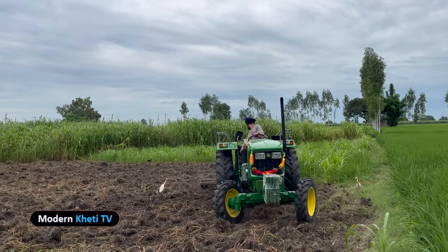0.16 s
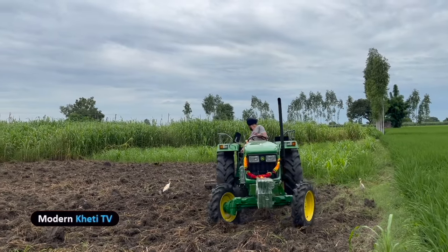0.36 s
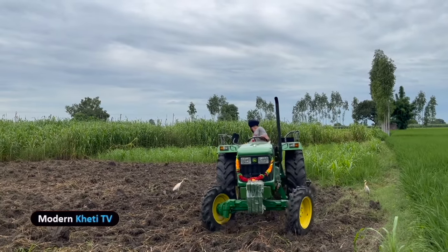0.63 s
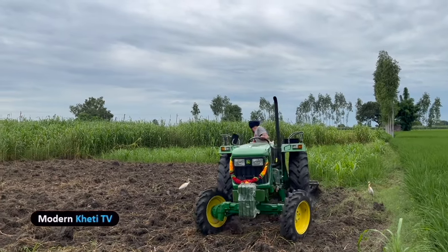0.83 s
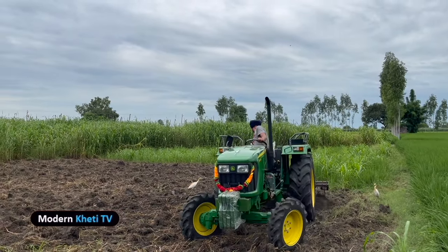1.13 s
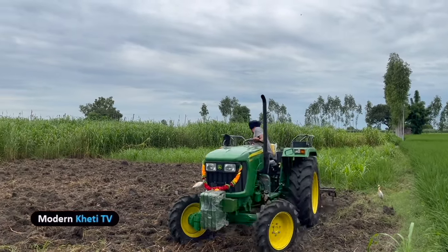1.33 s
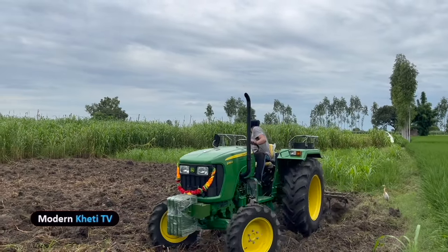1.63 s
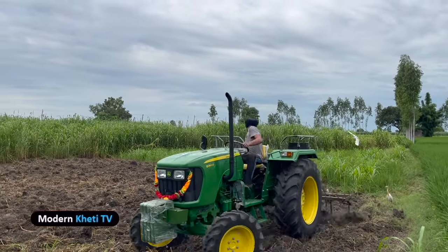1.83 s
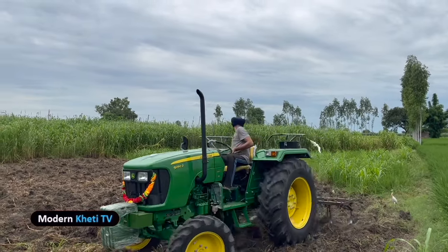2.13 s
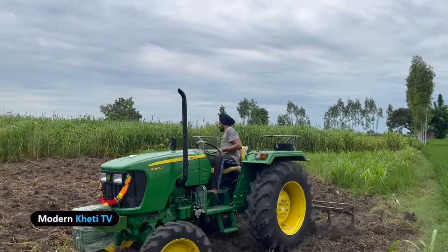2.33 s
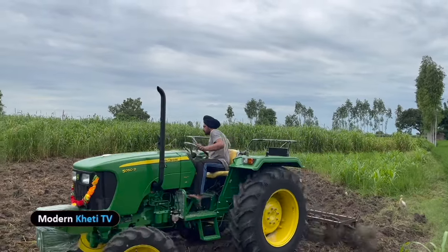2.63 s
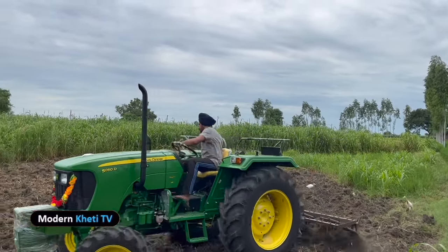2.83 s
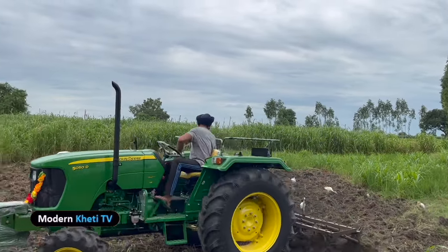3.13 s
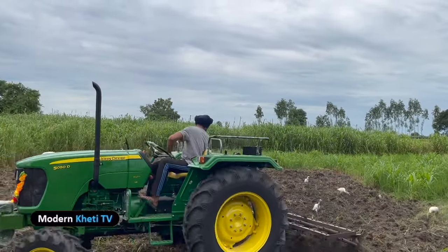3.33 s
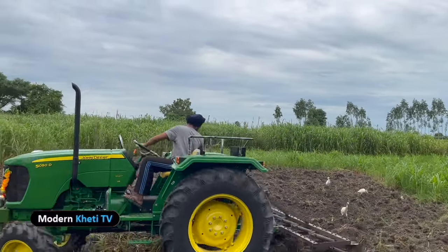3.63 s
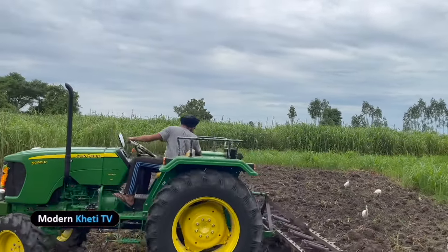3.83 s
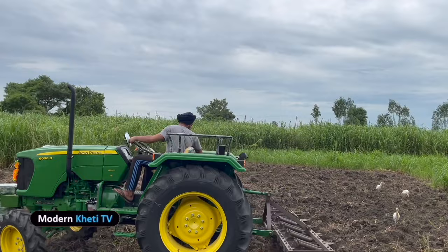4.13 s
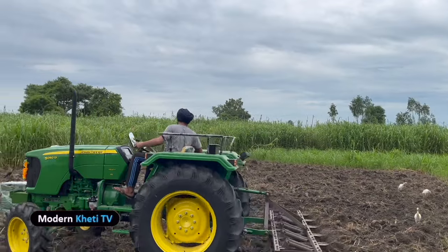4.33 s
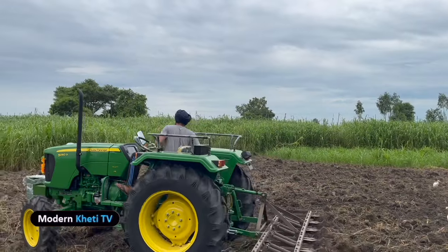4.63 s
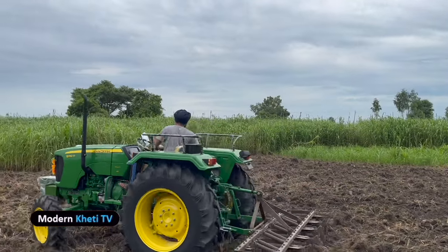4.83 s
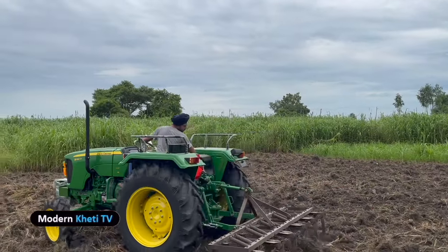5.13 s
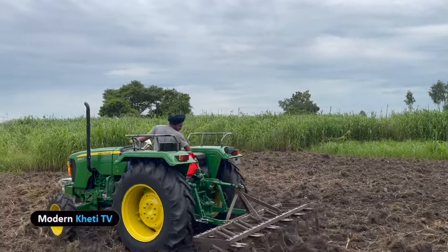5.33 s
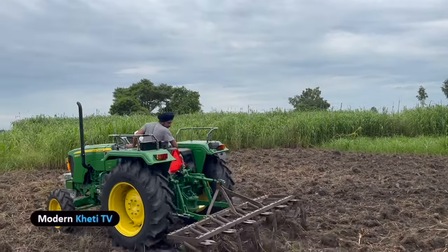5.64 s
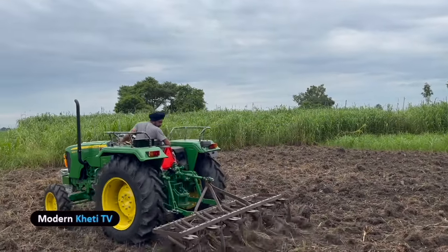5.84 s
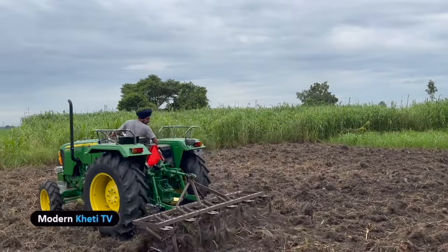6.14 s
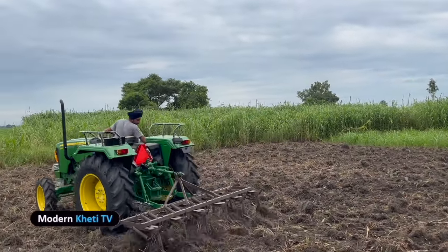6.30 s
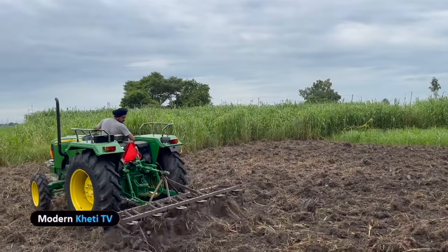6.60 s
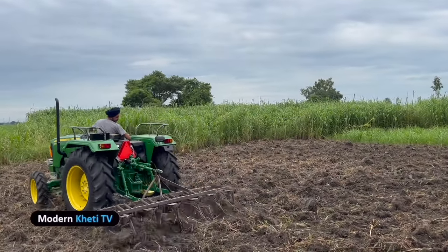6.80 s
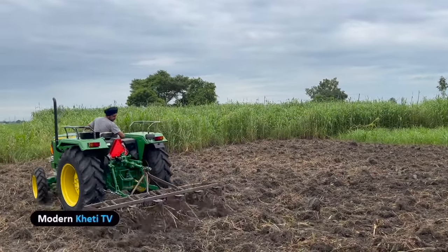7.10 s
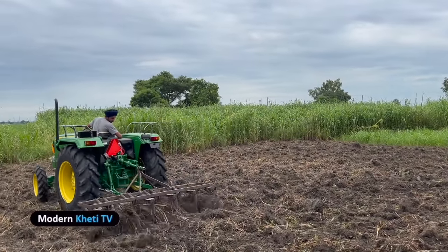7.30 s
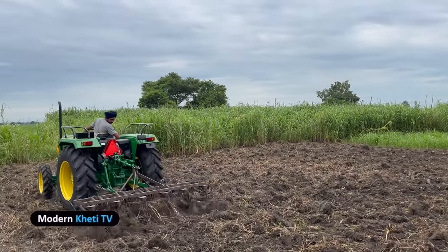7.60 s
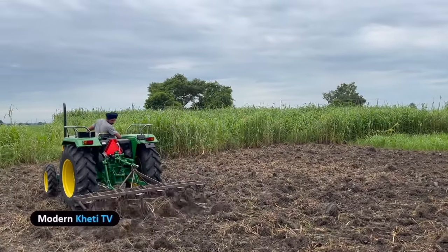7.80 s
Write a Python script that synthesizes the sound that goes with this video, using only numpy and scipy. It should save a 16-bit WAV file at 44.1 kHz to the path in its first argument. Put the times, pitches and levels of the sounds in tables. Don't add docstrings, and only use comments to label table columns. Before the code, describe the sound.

A three-cylinder diesel tractor works in an open field. It approaches with fast, low exhaust pulses and hard hollow barks in the first second, then its side passes with a boomier drone, clatter and brief gear whine. From behind it grows duller and quieter. The engine briefly races and slackens as the load slips. Close stereo microphones, outdoors, almost no reverberation.

```python
import sys
import numpy as np
from scipy import signal
from scipy.io import wavfile
from scipy.ndimage import uniform_filter1d

SR = 44100
rng = np.random.default_rng(int(sys.argv[2]) if len(sys.argv) > 2 else 0)


def to_wav(sig):
    pcm = np.clip(np.atleast_2d(sig), -1, 1) * 32767
    pcm = np.round(pcm).astype(np.int16)
    wavfile.write(sys.argv[1], SR, pcm.T)


def nominal_scale(level):
    x = np.asarray(level, float) / 20
    return 10 ** x


N = 351036

# cut_s, slip_size, half_length_s
TINE_SLIPS = [(0.14, 6.1, 0.2), (1.39, 6.1, 0.117), (2.04, 7.1, 0.143), (2.52, 4.1, 0.162),
              (3.26, 1.1, 0.107), (3.82, 3.6, 0.415), (4.69, 2.0, 0.173), (5.28, 4.2, 0.077),
              (6.03, 1.2, 0.069), (6.48, 2.8, 0.099), (7.49, 1.4, 0.119), (7.8, 4.1, 0.191)]


def evened(x):
    return x / np.sqrt(np.mean(np.abs(x) ** 2) + 1e-20)


def columns(rows, at):
    first, *rest = np.transpose(rows)
    return np.array([np.interp(at, first, c) for c in rest])


def facing(t):
    # time_s, aspect (0 front, 1 flank, 2 rear)
    turning = [
        (0, 0.13),
        (1.4, 0.34),
        (2.4, 0.81),
        (3.8, 1.056),
        (5.4, 1.476),
        (7.96, 1.464),
    ]
    aspect = columns(turning, t)[0]
    return np.array([np.clip(1 - abs(aspect - k), 0, 1) for k in range(3)])


def slips(t, sizes, before=1, after=1):
    total = 0
    for (s, _, half), size in zip(TINE_SLIPS, sizes):
        width = half * np.where(t < s, before, after)
        total = total + size * np.exp(-((t - s) / width) ** 2)
    return total


def crank(t):
    # time_s, firings_per_s
    held_speed = [(-.095, 31.185), (.519, 29.222), (1.444, 31.606), (1.465, 31.155), (1.98, 30.129),
                  (2.018, 30.846), (2.956, 31.186), (4.13, 29.895), (4.457, 31.547), (4.761, 30.775),
                  (5.5, 32.127), (6.12, 31.01), (6.407, 31.914), (6.554, 30.399), (7.268, 30.777),
                  (7.725, 30.035), (7.96, 32.849)]
    race_per_slip, cut_lag_s = .483, .152
    rate = columns(held_speed, t)[0] + race_per_slip * slips(t + cut_lag_s, np.transpose(TINE_SLIPS)[1])
    turns = np.cumsum(rate) / SR - .135
    return rate, turns


def pull(t):
    # time_s, effort
    load = [(0, 0.29), (.15, 0.2), (.45, 0.82), (1.15, 0.83), (1.3, .2), (1.5, 0.24), (1.7, 0.64),
            (1.9, 0.28), (2.3, .4), (2.5, 0.17), (2.9, 1), (3.15, 0.43), (4, 0.46), (5.05, 0.4),
            (6.45, 0.1), (6.9, 0.75), (7.4, 0.65), (7.96, 0.05)]
    return np.clip(columns(load, t), 0, 1)


def source_levels(t, effort):
    # front_db, flank_db, rear_db, share_of_distance_loss, full_effort_db
    layers = [
        (-16, -17.5, -30, 0.2, 1),
        (-25.5, -11.5, -28.5, 2.56, -0.3),
        (-30, -21.5, -29, 0.84, 0.4),
        (-33, -27, -41.5, 1.19, 2),
    ]
    # time_s, distance_loss_db
    distance = [(0, 0), (.5, -1.3), (1.15, -0.9), (1.8, -.6), (3, -3.5), (4.2, -2.5), (5.6, -4), (7, -5.5),
                (7.96, -8)]
    cuts = [4.8, 5.2, 6.4, 3.6, 1.2, 3.5, 2.8, 4.5, 1.2, 2.3, 0.47, 2.1]
    cut_shares = [
        (0.74, 1.6, 1.2),
        (.8, 0.88, 2.9),
        (.5, 0.35, 0.47),
        (1.27, 0.97, 0.73),
    ]
    cut_db = slips(t + 0.027, cuts, before=0.8, after=1.26)
    influences = np.vstack([facing(t), columns(distance, t), effort])
    return np.dot(layers, influences) - np.dot(cut_shares, facing(t)) * cut_db


def drift(hz, count):
    z = rng.standard_normal((count, N // 64 + 2, 2)) @ [1, 1j]
    z = signal.lfilter([1], [1, -np.exp(-2 * np.pi * hz * 64 / SR)], z)
    return np.repeat(evened(z), 64, axis=1)[:, :N]


def resonate(x, hz, width):
    return signal.lfilter(*signal.iirpeak(hz, hz / width, SR), x)


def noise(table, patchy_db):
    frames, hz = N // 128 + 5, np.fft.rfftfreq(512, 1 / SR)
    inside = (hz > table[0][0] / 2) & (hz < table[-1][0] * 1.3)
    shares = facing(np.arange(frames) * 128 / SR)
    gain = nominal_scale(columns(table, hz).T @ shares) * inside[:, None]
    gain /= np.sqrt((gain ** 2).mean(0))
    patches = uniform_filter1d(rng.standard_normal((frames, 257)), size=14, axis=0)
    patches = evened(uniform_filter1d(patches, size=5, axis=1))
    z = (rng.standard_normal((frames, 257, 2, 2)) @ [1, 1j]).T
    z = z * gain * nominal_scale(patchy_db * patches.T)
    return evened(signal.istft(z, nperseg=512, noverlap=384)[1][:, :N])


def burst(turns, rate, rise_s, fall_s):
    age = (turns % 1) / rate
    return evened((1 - np.exp(-age / rise_s)) * np.exp(-age / fall_s))


def blows(turns, spread_db, count):
    firing = np.floor(turns).astype(int) + 1
    total = firing[-1] + 1
    habit_db = np.array([1.2, -.3, -.9])[np.arange(total) % 3, None]
    db = spread_db * rng.standard_normal((total, count)) + habit_db
    return nominal_scale(db)[firing].T


def body(t, turns, rate, body_db, share):
    # freq_hz, front_db, flank_db, rear_db
    wash_bands = [(30, -10, -7, -12), (102.2, 0, -4.5, 21), (202, 4.5, 7.5, -6), (270, 3, 1, 0.5),
                  (345, 4.5, 0.5, 15), (437, 1.5, -2, -1), (744, -1.5, -2.5, 1.5), (977, -5.5, -8, 3.5),
                  (1110, -6, -5, -3.5), (1260, -6, -7.5, -3), (1860, -5, -14.5, -8.5),
                  (2120, -9.5, -14, -17)]
    # freq_hz, width_hz, front_db, flank_db, rear_db, swell_start_s, swell_end_s, swell_db
    whines = [(429.2, 34, -4.5, -15, -7, 6.5, 5.2, 3), (1303, 34, -36, -26.5, -19, 6.45, 7.6, 11.5),
              (1755, 43, -16.5, -19.5, -18, 6, 7.1, -1), (2762, 63, -13, -24.5, -13.5, 5.5, 5.2, 4),
              (3596, 85, -14, -37.5, -41, 1.8, 3.7, 17), (5200, 420, -39, -22, -35, 3.6, 3.4, 8)]
    throb = burst(turns - .05, rate, rise_s=.002, fall_s=0.0061)
    wash = nominal_scale(1.5) * noise(wash_bands, 1.23) * (np.sqrt(1 - share) + np.sqrt(share) * throb)
    white = rng.standard_normal((N, 2)).T
    for hz, width, *db, start, end, swell_db in whines:
        swell = np.clip(np.minimum(t - start, end - t) / 0.077, 0, 1)
        level_db = np.dot(db, facing(t)) + swell_db * swell
        wash = wash + nominal_scale(level_db) * evened(resonate(resonate(white, hz, width), hz, width))
    gear_db = np.interp(t, [2.4, 2.6, 3.0, 3.2, 4.6, 5.0], [-21, -1.0, -5.5, -34, -25, -6])
    wash = wash + nominal_scale(gear_db) * np.cos(2 * np.pi * 14 * turns)
    return nominal_scale(body_db - 2.0) * wash


def knock(t, turns, rate, knock_db, share):
    # freq_hz, front_db, flank_db, rear_db
    block_bands = [(1460, -11, -7.5, -3), (2040, -15.5, -9, -41), (2350, 1, -15, -17),
                   (2880, -2.5, 0, -4.5), (3220, -0.5, -1.5, 1.5), (3800, 3, -5, -6.5),
                   (4230, -3.5, -7.5, -5), (5100, -8.5, -10, -8), (6200, -6.5, -13.5, -8.5),
                   (8600, -10, -11, -14), (10300, -13.5, -11.5, -8), (12600, -17.5, -17.5, -14),
                   (14300, -19, -18, -5), (15600, -20, -26, -45)]
    # freq_hz, width_hz, front_db, flank_db, rear_db
    metal = [(2420, 120, -13, -22, -11), (2680, 65, -21, -3, 16), (3510, 140, -28, -3, 9),
             (3870, 170, -2, -4.5, 14), (4340, 160, 4, -8.5, 23)]
    shares = facing(t)
    strength = blows(turns, 0.99, count=3 + len(metal))
    clatter = signal.lfilter([.7], [1, -.3], noise(block_bands, 2.2))

    fall_s = np.dot([.009, .008, .004], shares)
    hiss = noise(block_bands, 2.5)
    block = signal.lfilter(*signal.butter(2, 5000, fs=SR), hiss)
    low = strength[0] * block * burst(turns, rate, 0.011, fall_s)
    high = strength[1] * (hiss - block) * burst(turns, rate, 0.0044, 0.89 * fall_s)

    tick = rng.standard_normal((N, 2)).T * burst(turns, rate, rise_s=0.00011, fall_s=0.001)
    rings = 0
    for (hz, width, *db), s in zip(metal, strength[3:]):
        rings = rings + nominal_scale(np.dot(db, shares)) * evened(resonate(tick * s ** 3, hz, width))
    valves = evened(resonate(tick * strength[2] ** 4, 9800, 3000)) * nominal_scale(np.dot([-30, -19, -26], shares))
    struck = 1.47 * (low + high) + nominal_scale(-12) * rings
    return nominal_scale(knock_db) * (np.sqrt(1 - share) * clatter + np.sqrt(share) * struck + valves)


def barks():
    # start_s, peak_db, pitch_hz, bonnet_db
    hard_firings = [(0.393, -12, 600, -27), (0.426, -22, 630, -19), (0.461, -12.5, 574, -19),
                    (0.529, -19, 780, -23), (0.565, -17, 655, -31), (0.597, -22, 600, -27),
                    (0.629, -18, 915, -17), (0.665, -33, 456, -22), (0.698, -14.5, 920, -40),
                    (0.731, -13.5, 580, -18), (0.766, -17, 745, -26), (0.8, -12, 860, -22),
                    (0.865, -13, 654, -23), (0.898, -15, 630, -30), (0.932, -15, 537, -26),
                    (0.966, -19, 560, -29), (0.998, -13.5, 860, -43), (1.03, -11.5, 880, -16),
                    (1.062, -5.5, 533, -42), (1.093, -11, 860, -30), (1.124, -13, 467, -21.5),
                    (1.156, -11, 606, -33), (1.185, -7.5, 620, -37), (1.217, -8.5, 537, -21)]
    bonnet_hz, bonnet_decay_s = 323, 0.01
    out, age = np.zeros(N), np.arange(2400) / SR
    for (s, db, hz, bonnet_db), (a, b, c) in zip(hard_firings, rng.random((len(hard_firings), 3))):
        turns = hz * (age + 0.27 * 0.002 * (1 - np.exp(-age / 0.0012)))
        ring = np.sin(2 * np.pi * (turns + a))
        ring = ring + 0.44 * np.sin(2 * np.pi * (1.53 * turns + b))
        ring = nominal_scale(db + 3.0) * ring * age / 0.0047 * np.exp(1 - age / 0.0019)
        bonnet = np.sin(2 * np.pi * (bonnet_hz * age + c))
        bonnet = bonnet * (1 - np.exp(-age / 0.0034)) * np.exp(-age / bonnet_decay_s)
        out[round(s * SR):][:len(age)] += ring + nominal_scale(bonnet_db + 5.5) * bonnet
    return out


def exhaust(t, turns, exhaust_db, boom_db):
    orders = [(3, -25, -22, -21), (4, -17, -18.5, -17), (5, -15, -8, -15), (6, 0, 1.5, -4),
              (6.995, -11.5, -12.5, -28), (8, -15, -5, -20), (9, -4, -7.5, 1), (10, -23, -39, -9),
              (11, -31, -21, -22), (12, -12.5, -7, -15), (13, -2, -15, -18), (14, -20, -12.5, -9),
              (15.01, -5.5, -2.5, -38), (16, -13.5, -0.5, -7), (17, -5, -13.5, -13), (18.43, -9, -5, -7),
              (20.8, -19, -23, 0)]
    out, shares = np.zeros(N), facing(t)
    quick, slow = drift(14.4, count=len(orders)), drift(.6, count=len(orders))
    for (k, *db), z, lazy in zip(orders, quick, slow):
        k = round(k)
        if k % 3 == 0:
            shape = np.exp(1.48j) + .08 * z
        else:
            shape = .85 * lazy / abs(lazy) + .15 * z
        level = nominal_scale(np.dot(db, shares) + (exhaust_db if k <= 12 else boom_db))
        out += level * (shape * np.exp(2j * np.pi * k / 3 * (turns + .382))).real
    return 1.216 * out


def ports(waves):
    # time_s, extra_path_ms, share
    ground = [(2.5, 2.9, 0.05), (3.5, 1.97, 0.16), (5.5, 1.874, 0.36), (7.96, 1.74, 0.55)]
    # freq_hz, side_over_mid_front_db, side_over_mid_later_db, coherence, phase_rad
    pair_response = [(50, -17, -4, 1, 1.75), (100, -29, -18, 0.95, 2.1), (430, -29.5, -10.5, 1, 1.5),
                     (1010, -19.5, -5, 1, 0.82), (1540, -8, 0.5, 0.66, 1.74), (2120, -24, -8.5, 0.68, 1.25),
                     (3210, -16.5, 1, 0.73, 1.07), (4530, -25.5, -1.5, 0.65, 0.7), (5560, 2, 0, .5, -2.2),
                     (6700, -4, -8, .5, -0.5), (7380, 1.5, 3, 0.47, -1.8), (8300, 14, 15.5, 0.24, -6.5),
                     (8510, 9.5, 9.5, 0.44, 1.5), (10950, -1.5, -5.5, 0.24, 1), (11800, -19.5, -33, .1, 3),
                     (12940, -12.5, -10, .4, -1.6), (15130, 14, 17.5, .2, -1.6)]
    hz, t, z = signal.stft(waves, SR, nperseg=512)
    path_ms, share = columns(ground, t)
    clean = np.interp(hz, [600, 1070, 2220, 3740], [0, 1, 1, 0])[:, None]
    delay = np.exp(-2j * np.pi * hz[:, None] * path_ms / 1000)
    direct, scattered = z * (1 - clean * share * delay)
    front_db, later_db, same, radians = columns(pair_response, hz)[:, :, None]
    front = facing(t)[0]
    angle = np.arctan(nominal_scale(front * front_db + (1 - front) * later_db))
    same = np.clip(same, 0, 1)
    mid = np.cos(angle) * direct
    side = same * np.exp(1j * radians) * direct + np.sqrt(1 - same ** 2) * scattered
    side = np.sin(angle) * side
    return signal.istft(np.array([mid + side, mid - side]), SR, nperseg=512)[1][:, :N]


def scene():
    t = np.arange(N) / SR
    rate, turns = crank(t)
    effort = pull(t)
    exhaust_db, boom_db, body_db, knock_db = source_levels(t, effort)
    full_shares = [(.58, 0.44, 0.19), (0.25, 0.095, 0.1)]
    knock_share, throb_share = np.clip(effort * np.dot(full_shares, facing(t)), 0, .95)
    burn = turns - .14
    wash = body(t, burn, rate, body_db, throb_share)
    knocks = knock(t, burn, rate, knock_db, knock_share)
    return ports(wash + knocks + barks() + exhaust(t, turns, exhaust_db, boom_db))


def top_cut(x):
    return signal.sosfilt(signal.butter(12, 15720, fs=SR, output="sos"), x)


def record(dry):
    return top_cut(dry)


dry = scene()
out = record(dry)
to_wav(out)
```